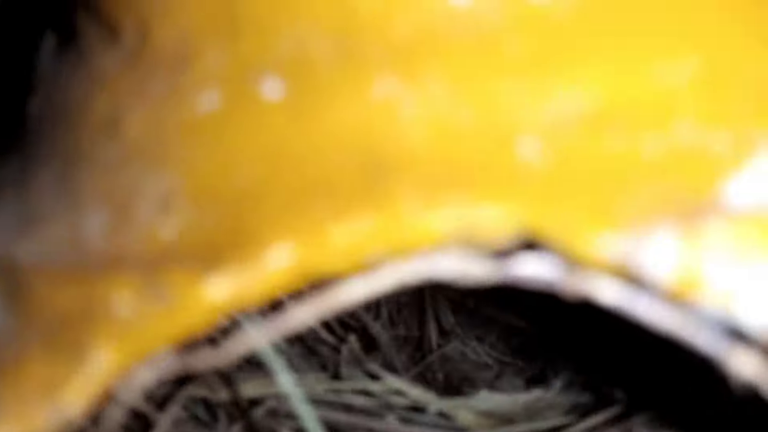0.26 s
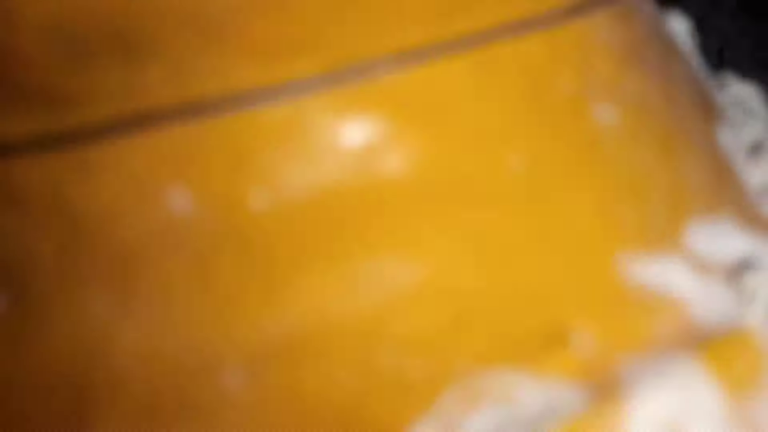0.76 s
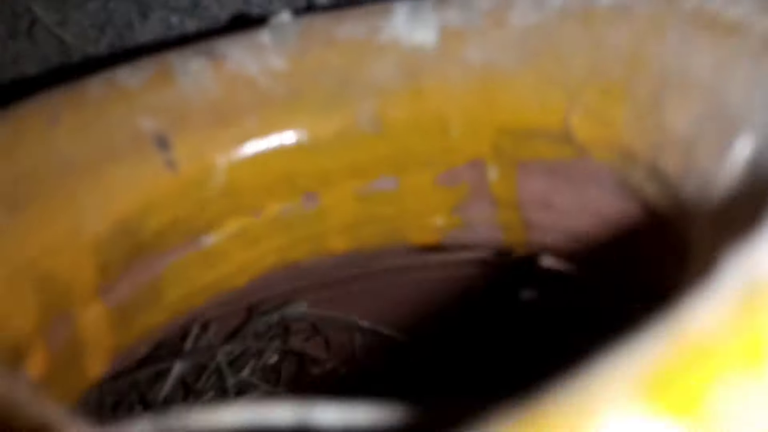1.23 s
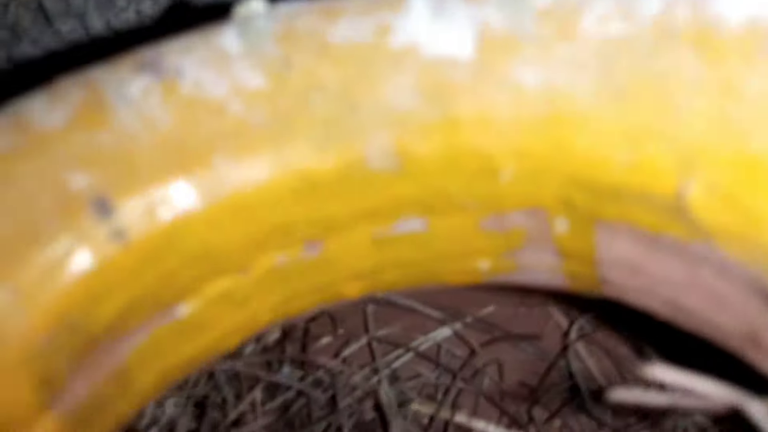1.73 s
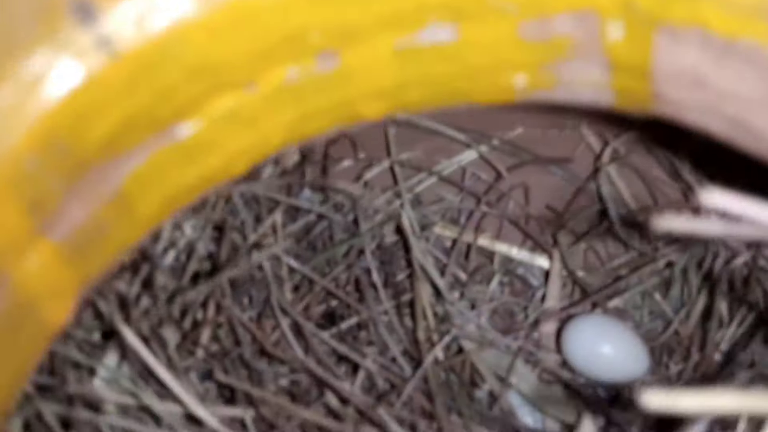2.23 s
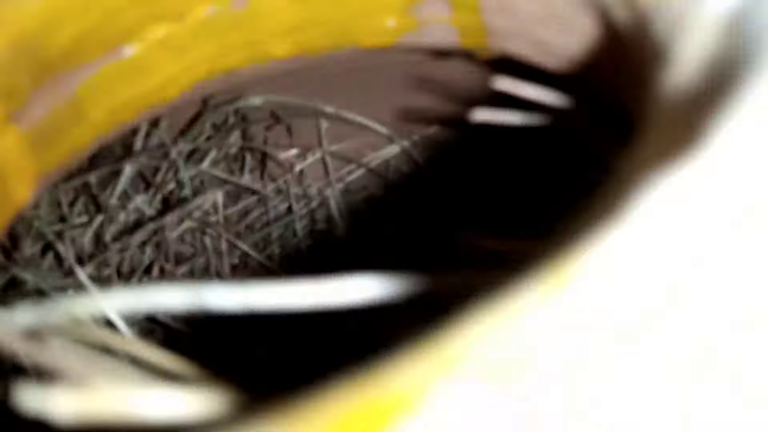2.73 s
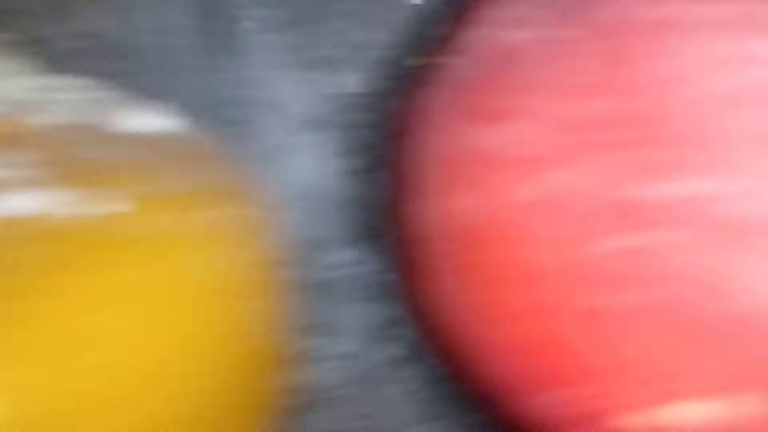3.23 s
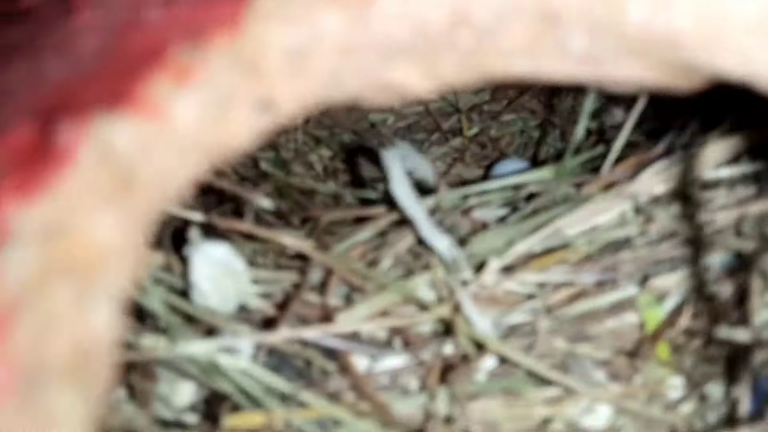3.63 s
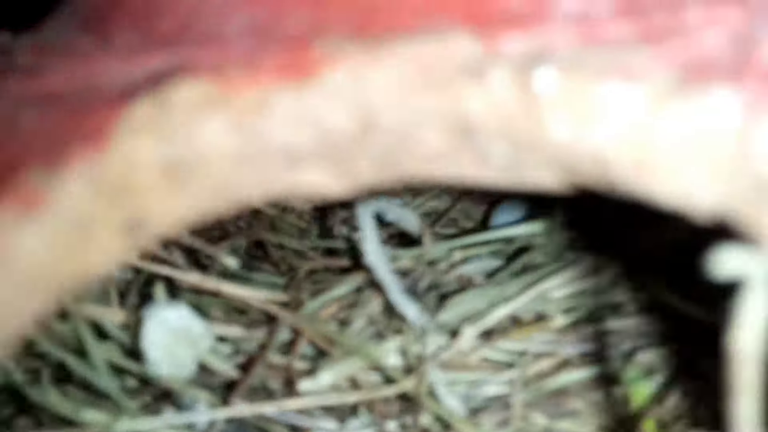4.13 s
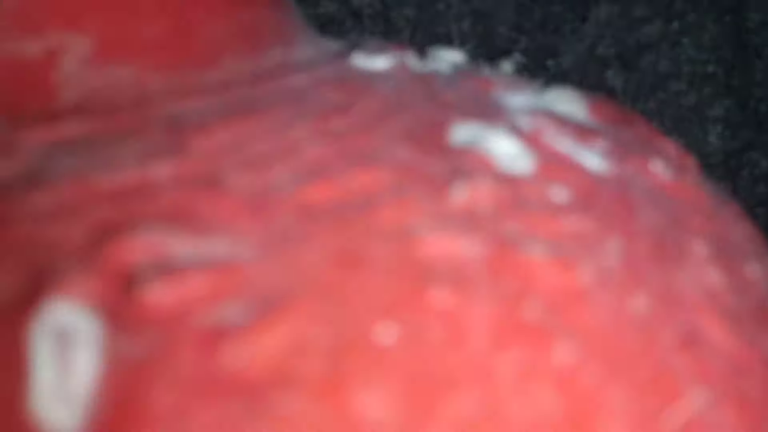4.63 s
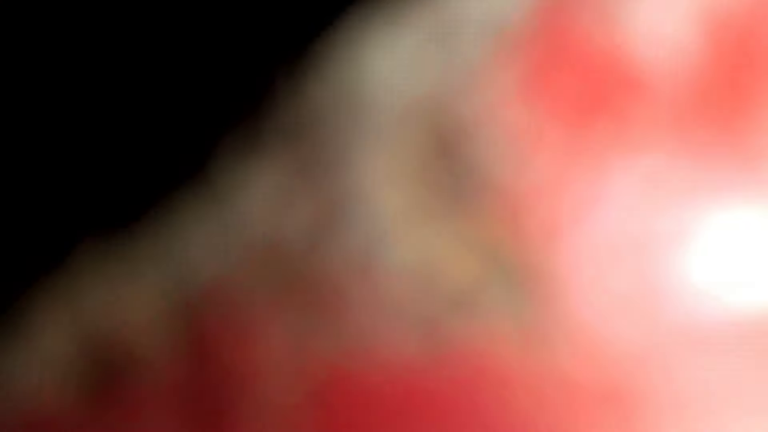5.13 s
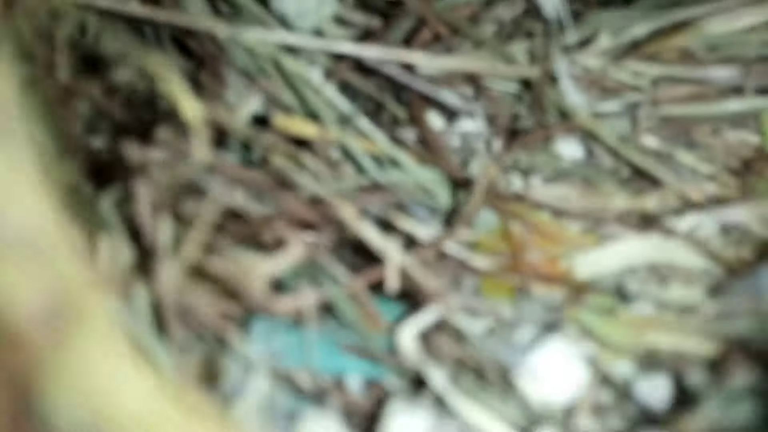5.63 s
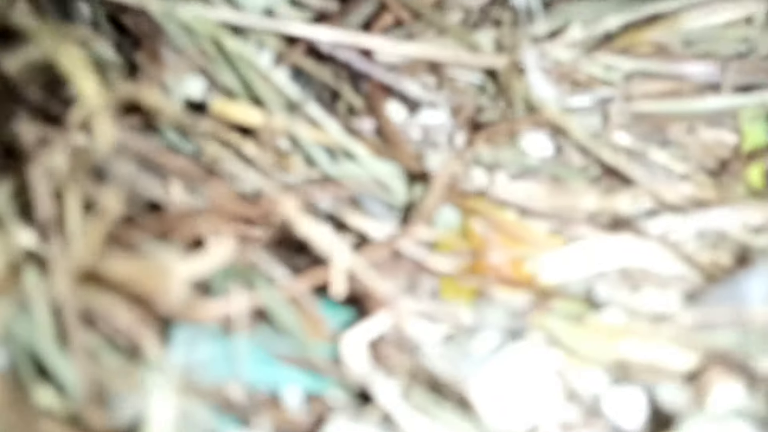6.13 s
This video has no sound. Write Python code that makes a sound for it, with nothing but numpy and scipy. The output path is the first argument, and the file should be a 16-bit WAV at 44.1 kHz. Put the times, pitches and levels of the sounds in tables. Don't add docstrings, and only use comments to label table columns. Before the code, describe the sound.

A hard-walled aviary with short reflections, a soft flock murmur and low outdoor rumble, heard through a small handheld microphone. From 0 to 0.7 s, brief hoarse and clear finch chirps around 2 to 3 kHz mix with wing flaps and soft clay clacks near 0.5 s. A hollow thump lands at 0.8 s, with dry straw scraping. Faint chirps follow at 1 to 1.3 s, then a thin wavering whistle arches up and down at 1.45 to 1.65 s. Until 3 s it is mostly wing flutters, small bright claw ticks and pot taps. At 3.0 to 3.3 s, tiny close peeps join chirps; from 3.6 to 5.3 s calls crowd together, clear, hoarse and squawky, with a pot clack at 3.9 s and a distant dove coo around 4.6 s. After 5.05 s wing rustle and handling rumble surge; a pot clacks at 5.5 s, the hardest knock comes at 6.17 s, and last chirps end it.

```python
import sys
import numpy as np
from scipy import signal
from scipy.fft import rfft, irfft, next_fast_len
from scipy.io import wavfile

SR = 44100
rng = np.random.default_rng(int(sys.argv[2]) if len(sys.argv) > 2 else 0)


def file_out(sig):
    cols = np.atleast_2d(sig).T
    lim = np.clip(cols, -1, 1)
    pcm = np.round(lim * 32767).astype(np.int16)
    wavfile.write(sys.argv[1], SR, pcm)


def voltage_ratio(decibels):
    exponent = np.asarray(decibels, float) / 20
    return 10 ** exponent


N = 280476


def rms_one(x):
    return x / np.sqrt(np.mean(x ** 2) + 1e-20)


def at_hz(points, hz):
    return np.interp(np.log(hz), np.log(np.array(points)[:, 0]), np.array(points)[:, 1])


def in_time(rows):
    s, *columns = np.transpose(rows)
    return [np.interp(np.arange(N) / SR, s, c) for c in columns]


def filtered(x, order, edge_hz, kind):
    return signal.sosfilt(signal.butter(order, edge_hz, kind, fs=SR, output="sos"), x)


def drift(rate_hz, size):
    r = np.exp(-2 * np.pi * rate_hz / SR)
    settle = 8000
    return rms_one(signal.lfilter([1], [1, -2 * r, r * r], rng.standard_normal(size + settle))[settle:])


def bands(size):
    hz = np.maximum(np.arange(size // 2 + 1) * SR / size, 1)
    white = rfft(rng.standard_normal(size))
    for centre in 25 * 2 ** np.arange(0, 10, .5):
        yield centre, hz, white * np.clip(1 - 2 * np.abs(np.log2(hz / centre)), 0, 1)


def hiss(spectrum, patchy_db, rate_hz):
    size, out = next_fast_len(N), 0
    for centre, hz, band in bands(size):
        if spectrum[0][0] <= centre * 1.4 and centre <= spectrum[-1][0] * 1.4:
            flicker = np.repeat(drift(rate_hz * 32, N // 32 + 1), 32)[:N]
            out = out + irfft(band * voltage_ratio(at_hz(spectrum, hz)), size)[:N] * voltage_ratio(patchy_db * flicker)
    return rms_one(out)


def ring(clicks, modes):
    out = 0
    for hz, level_db, t60 in modes:
        r, w = voltage_ratio(-60 / (t60 * SR)), 2 * np.pi * hz / SR
        resonator = [0, voltage_ratio(level_db) * np.sin(w)], [1, -2 * r * np.cos(w), r * r]
        out = out + signal.lfilter(*resonator, clicks + 1e-18)
    return out


def gliding(*groups):
    rows = []
    for table, glide in groups:
        for s, length, hz, level_db, tilt_db in table:
            rows.append((s, length, hz * (1 - glide / 2), hz * (1 + glide / 2), level_db, tilt_db))
    return rows


def chirps(table, jitter, jitter_hz, flutter_db, breath_db, attack):
    # [f/Hz, level/dB]
    beak = [(1500, -5.5), (2300, -2), (4500, 8.5), (6200, 9.5), (7200, 8), (7900, -35), (9000, -21.5),
            (12000, -24.5), (13500, -35), (15000, -24)]
    out, order = np.zeros(N), np.arange(1, 8)[:, None]
    wobble, flutter = drift(jitter_hz, N), voltage_ratio(flutter_db * drift(164, N))
    breath = rms_one(filtered(rng.standard_normal(N), 3, [2600, 7200], "band"))
    for s, length, start_hz, end_hz, level_db, tilt_db in table:
        at = np.arange(round(s * SR), min(round((s + length) * SR), N))
        u = np.linspace(0, 1, len(at))
        arch = 1 + 0.11 * (u * (1 - u) - 1 / 6)
        pitch = (start_hz + (end_hz - start_hz) * u) * arch
        phase = 2 * np.pi * np.cumsum(pitch * (1 + jitter * wobble[at])) / SR
        weight = voltage_ratio(tilt_db * np.minimum(order, 6600 / pitch) + at_hz(beak, order * pitch))
        weight = weight * (order * pitch < .4 * SR)
        note = rms_one(np.sum(weight * np.sin(order * phase), axis=0)) + voltage_ratio(breath_db) * breath[at]
        swell = np.clip(np.minimum(u / attack, (1 - u) / 0.37), 0, 1)
        out[at] += voltage_ratio(level_db) * note * flutter[at] * swell
    return out


def finches():
    clear_falling = [(3.954, .02, 3150, -32, 18), (3.972, 0.029, 2700, -35.5, 18),
                     (1, 0.04, 1780, -49.5, -16), (3.088, .06, 1880, -39, -4),
                     (1.158, 0.026, 2060, -36, -1.5), (2.5, 0.0175, 3620, -44, 40),
                     (5.03, 0.043, 2850, -32, -10)]
    clear_level = [(.545, 0.054, 2630, -33.5, -14), (.556, 0.047, 2546, -29, 15),
                   (3.57, .07, 2125, -51, -25), (4.356, 0.045, 2910, -22, 11), (6.291, .03, 2300, -40, -25),
                   (3.03, 0.035, 1847, -46, -20), (3.108, .025, 2700, -35, 22),
                   (3.497, 0.039, 2540, -53, -25), (3.503, .01, 3210, -44, 25),
                   (4.395, 0.046, 3046, -22.5, 7.5), (5.218, 0.033, 2798, -23, 18),
                   (5.255, .045, 2830, -35, 18), (1.236, 0.023, 2044, -34, 0),
                   (2.625, 0.065, 3230, -43.5, 12), (3.16, 0.02, 3130, -32, 18),
                   (3.19, .05, 3130, -41.5, 18), (3.165, 0.02, 2750, -32.5, 12),
                   (3.605, 0.047, 3515, -45, -18), (4.62, 0.014, 3100, -49, -13),
                   (5.385, 0.017, 2740, -32.5, 15), (6.16, 0.035, 2316, -25, 24),
                   (6.293, 0.067, 2313, -28, 24)]
    clear_rising = [(.772, 0.018, 3600, -47, 19), (3.03, 0.017, 2820, -34.5, 13),
                    (3.042, .018, 3000, -40, 20), (3.657, 0.053, 3220, -26.5, 8),
                    (3.75, 0.046, 3500, -44.5, -15), (4.865, 0.03, 3135, -33, 4),
                    (4.889, .03, 3170, -26, 8)]
    hoarse_falling = [(.096, 0.041, 2150, -39, -9), (.097, .02, 2850, -37, 16),
                      (.112, 0.029, 2990, -28, 14), (.11, 0.044, 2500, -40, 13),
                      (3.325, 0.03, 3060, -43, -23), (1.013, 0.031, 2030, -46, -7),
                      (1.321, 0.03, 1990, -40, 0), (4.915, .055, 2860, -39, -2),
                      (4.42, 0.049, 2800, -38.5, -2), (5.778, 0.034, 2134, -39, -7),
                      (5.808, 0.05, 1940, -34, -5)]
    hoarse_rising = [(4.216, 0.022, 2480, -35, -3), (.688, .04, 2430, -45, 12), (2.73, .05, 1800, -56, -25),
                     (2.68, .04, 2000, -57, -25), (.085, 0.056, 1790, -41.5, -1.5),
                     (1.455, 0.057, 2916, -51, 35), (3.644, 0.082, 3118, -32, 3),
                     (4.35, 0.055, 3045, -26.5, 7), (4.514, 0.0086, 3340, -36, 3),
                     (4.843, 0.1, 3160, -31, -1.5), (5.003, 0.077, 3084, -30.5, 0),
                     (5.784, 0.03, 2400, -36, -2), (5.81, .06, 2520, -45, -18),
                     (6.02, 0.037, 2250, -34.5, 66), (6.085, 0.076, 2145, -42.5, -1),
                     (1.081, 0.029, 2240, -40.5, -4), (6.302, 0.022, 2735, -24, 11),
                     (4.285, 0.025, 2253, -33, -4)]
    harsh_falling = [(.678, 0.025, 3020, -33, -10.5), (3.045, .06, 2400, -44, 8),
                     (3.767, .025, 2600, -35, 8), (3.953, 0.04, 3043, -36.5, 15),
                     (3.045, 0.052, 3650, -44.5, -6), (3.99, .07, 3690, -43, -8),
                     (5.472, .03, 3450, -53, -15), (3.045, 0.048, 2444, -40, -3),
                     (3.96, 0.048, 3310, -42, -12), (4.045, 0.0088, 2270, -48, -3),
                     (4.13, 0.038, 2215, -37, -3), (4.14, 0.049, 3020, -35, 5),
                     (5.205, 0.052, 3235, -39, 35), (5.83, 0.097, 2054, -43.5, -8)]
    # [t/s, length/s, f/Hz, level/dB, tilt/dB per harmonic]
    harsh_rising = [(.562, 0.05, 3010, -35.5, -6), (3.613, .025, 3167, -48, 30),
                    (3.99, 0.05, 2180, -44.5, -5), (4.1, 0.055, 2450, -43, -4),
                    (4.14, 0.042, 3380, -44.5, -19), (.865, 0.076, 3370, -54.5, -6),
                    (3.545, 0.081, 1900, -54.5, -32), (3.02, 0.043, 3440, -47.5, -15),
                    (3.135, 0.054, 1830, -36.5, -4), (3.766, 0.029, 2180, -30.5, 13),
                    (3.833, 0.039, 2810, -34.5, 2), (3.89, 0.031, 2954, -32, 5.5),
                    (3.975, 0.07, 1900, -44, -3), (4.015, 0.03, 2154, -36.5, -2.5),
                    (4.081, 0.03, 2200, -33, -1), (5.025, 0.05, 3044, -28.5, 9),
                    (6.01, 0.026, 2695, -32, 17), (6.158, 0.015, 2797, -26, 7),
                    (6.292, 0.027, 2386, -37, -6)]
    clear = gliding((clear_falling, -0.061), (clear_level, 0), (clear_rising, 0.0674))
    hoarse = gliding((hoarse_falling, -0.0875), (hoarse_rising, 0.0337))
    harsh = gliding((harsh_falling, -0.0615), (harsh_rising, 0.0727))
    song = chirps(clear, jitter=.014, jitter_hz=180, flutter_db=2.5, breath_db=-20, attack=.19)
    song += chirps(hoarse, jitter=0.0318, jitter_hz=212, flutter_db=4, breath_db=-48.0, attack=0.15)
    song += chirps(harsh, jitter=.06, jitter_hz=250, flutter_db=4.5, breath_db=-7, attack=.07)
    return song


def whistle():
    # [t/s, f/Hz, level/dB]
    course = [
        (1.41, 2850, -72),
        (1.45, 2870, -40.5),
        (1.5, 3137, -44.5),
        (1.545, 3540, -46.5),
        (1.575, 3230, -40.5),
        (1.6, 2882, -32.5),
        (1.635, 2862, -32.5),
        (1.665, 2780, -73),
    ]
    # [order, level below the octave/dB]
    upper_partials = [(3, -20), (4, -26), (5, -30)]
    pitch, level_db = in_time(course)
    t = np.arange(N) / SR
    phase = 2 * np.pi * np.cumsum(pitch * (1 + .02 * drift(190, N))) / SR
    upper = sum(voltage_ratio(db) * np.sin(round(order) * phase) for order, db in upper_partials)
    octave_db = -12 + 0.9 * (level_db + 47.0)
    octave = voltage_ratio(octave_db) * (np.sin(2 * phase) + upper)
    sounding = (t > course[0][0]) * (t < course[-1][0])
    return voltage_ratio(level_db + 3.3 * drift(140, N)) * (np.sin(phase) + octave) * sounding


def near_peeps():
    # [t/s, length/s, f/Hz, level/dB, tilt/dB per harmonic]
    rising = [(3.056, .014, 2250, -40, -16), (3.123, .012, 2050, -40, -16), (3.152, .012, 2550, -36, 15),
              (3.261, .011, 2250, -37.5, -20), (3.568, .04, 2650, -51, -25)]
    # [t/s, length/s, f/Hz, level/dB, tilt/dB per harmonic]
    falling = [(3.264, .01, 3500, -41, -20), (3.107, .012, 2150, -40, -16), (3.27, .012, 2330, -35.5, -20)]
    sweep = .42
    notes = gliding((falling, -sweep), (rising, sweep))
    return chirps(notes, jitter=.01, jitter_hz=200, flutter_db=0.5, breath_db=-14, attack=.19)


def wings(rustle_db):
    # [f/Hz, level/dB per Hz]
    plumage = [(530, -1.5), (900, -1.5), (1230, -2), (1340, -1.5), (1630, 1), (2320, 2), (2850, -1),
               (3290, 5.5), (4040, 3), (6180, 5), (8270, -7), (13400, -17.5), (15200, -1.5), (16300, -20)]
    # [t/s, peak level of hiss/dB, wing body above it/dB]
    snaps = [(.3466, -39, -1), (.464, -27.5, -5), (.9744, -38.5, 19), (1.0849, -42, -4),
             (1.5229, -36.5, 6.5), (1.7225, -44.5, 12), (1.85, -41, 4), (1.137, -44, 6), (1.76, -42, 10),
             (3.7685, -44, 15), (3.913, -35, 29), (4.318, -28.5, -3.5), (4.361, -40, 12), (4.4643, -38, 0),
             (4.5146, -37, 6.5), (4.6224, -46, -2), (3.505, -46, 7), (.415, -43, -1), (2.29, -43, 8.5),
             (5.1841, -30.5, 24), (5.3704, -35, 12), (5.66, -38.5, 22), (6.0164, -54, -2), (6.151, -35, 33)]
    # [t/s, peak level of hiss/dB, wing body above it/dB]
    flaps = [(.16, -40.5, 14), (.237, -45.5, 0), (1.1368, -41, 3), (1.3977, -43, 5.5), (1.9614, -42, 8.5),
             (1.9979, -45, 9.5), (2.0443, -45, 9.5), (2.5127, -45, 9.5), (2.819, -42, 5), (2.9165, -35, 3),
             (3.1053, -61, -4), (3.3967, -38, 10), (3.411, -47, 17), (3.6541, -40, 20), (4.2482, -43, 3),
             (4.2617, -35, -10), (4.73, -42.5, 3.5), (5.016, -57, 24), (5.0544, -45, 12), (5.1307, -33, 12),
             (5.3158, -37, -25), (5.7309, -41, -2), (6.0681, -43, 12), (6.2946, -53, 25)]
    # [t/s, peak level of hiss/dB, wing body above it/dB]
    sweeps = [(.0927, -46, 22), (.529, -43, 2), (.6843, -49, 12), (.95, -44, 6.5), (1.2211, -42.5, 4.5),
              (1.56, -39.5, 9.5), (1.9072, -44, 6.5), (2.2039, -40, 3), (2.5523, -45, 11),
              (2.586, -41.5, 12), (2.8447, -42.5, 8), (3.1246, -31, 4), (3.2261, -37.5, 5),
              (3.3334, -38.5, 7.5), (3.623, -32, -12), (3.8891, -48, 5), (3.953, -43, 31),
              (5.0894, -37, 12), (5.5672, -38.5, 9), (5.912, -36.5, -7)]
    feathers, after = hiss(plumage, patchy_db=2.0, rate_hz=23), np.arange(SR // 4) / SR
    body = filtered(feathers, 4, 8500, "low")
    tips = filtered(feathers, 4, 8500, "high")
    tip_power = voltage_ratio(2 * rustle_db)
    body_power = voltage_ratio(2 * (rustle_db + 13.0))
    for table, t60_s in (snaps, 0.084), (flaps, 0.19), (sweeps, 0.32):
        for s, peak_db, body_db in table:
            i = round((s - 0.0043) * SR)
            rise = np.minimum(after / 0.0082, 1) ** 2
            fade = (voltage_ratio(-120 * after / t60_s) * rise)[:N - i]   # power, so twice 60 dB
            tip_power[i:i + len(fade)] += voltage_ratio(2 * (peak_db - 8.0)) * fade
            body_power[i:i + len(fade)] += voltage_ratio(2 * (peak_db + min(body_db, 12) - 6.5)) * fade
    crackle = voltage_ratio(2.34 * drift(155, N))
    return crackle * (rms_one(tips) * np.sqrt(tip_power) + rms_one(body) * np.sqrt(body_power))


def pots():
    # [t/s, peak level/dB, hollow share/dB, wall ring share/dB]
    knocks = [(.392, -36.5, 5.5, -42), (0.509, -36.5, 6, -31), (0.537, -43, 14, -30), (.549, -32.5, 6, -7),
              (0.565, -37, 14.5, -30), (.592, -33.5, 7, -16), (1.523, -28, -27, -46),
              (1.985, -24.5, -33, -14), (2.085, -32.5, -44, -41), (3.343, -25, 0.5, 8),
              (3.904, -18.5, -16, -3.5), (4.047, -40.5, 11, -35), (4.741, -49, -21, 14),
              (5.532, -20.5, -54, -9), (6.004, -42.5, 17, -15), (6.069, -31, -15, -16),
              (6.174, -11.5, -9, -29), (6.182, -21, -26, -23)]
    # [f/Hz, level/dB, t60/s]
    hollow = [(285, 6, 0.056), (398, -3.5, 0.059)]
    # [f/Hz, level/dB, t60/s]
    rim = [(494, 7.5, 0.029), (876, -2.5, 0.016), (1240, 0.5, 0.017), (2190, -14, 0.025)]
    # [f/Hz, level/dB, t60/s]
    wall = [(1426, -5.5, 0.24), (1680, -9, 0.06), (730, -24, 0.11)]
    # [f/Hz, level/dB, t60/s]
    next_wall = [(1450, -4, 0.099), (1620, -6, 0.065), (730, -25, .11)]
    s, peak_db, hollow_db, wall_db = np.transpose(knocks)
    later = s > 3.6
    parts = ((rim, -4), (hollow, hollow_db), (wall, wall_db - 99 * later), (next_wall, wall_db - 99 * ~later))
    out = 0
    for modes, share_db in parts:
        clicks = np.zeros(N)
        clicks[np.round(s * SR).astype(int)] = voltage_ratio(peak_db + share_db - 8.5)
        out = out + ring(clicks, modes)
    return filtered(out, 3, [130, 2200], "band")


def thump():
    # [f/Hz, level/dB, t60/s]
    floor = [(101, -9.5, 0.15), (187, 4, 0.037), (291, 1.5, 0.043), (473, 2.5, 0.046), (663, 9, 0.013),
             (986, -2, 0.022), (1234, 11.5, 0.0083), (1900, 9, 0.0034)]
    # [delay/s, level/dB]
    rebounds = [
        (.012, -18),
        (.021, -18),
        (.034, -24),
    ]
    blow_s, blow_db = .7838, -18
    click = np.zeros(N)
    click[round(blow_s * SR)] = -voltage_ratio(blow_db)
    for k, (delay, db) in enumerate(rebounds):
        click[round((blow_s + delay) * SR)] = (-1) ** k * voltage_ratio(blow_db + db)
    return filtered(ring(click, floor), 2, [70, 3500], "band")


def ticks():
    # [t/s, peak level/dB]
    contacts = [(0.977, -28), (1.1358, -29), (1.5224, -33), (1.6796, -38), (1.8282, -30.5), (1.9076, -27),
                (2.045, -30), (2.5127, -30), (2.8195, -31), (2.8439, -25), (3.4474, -27), (3.6517, -19.5),
                (4.5151, -23.5), (5.1841, -18.5)]
    # [f/Hz, level/dB per Hz]
    wire = [(3000, -11), (4500, -1.5), (6200, 1.5), (8000, -9.5), (13000, -20.5), (15200, -7)]
    rise_s, t60_s = .0015, .05
    out, after = np.zeros(N), np.arange(SR // 10) / SR
    hz = np.maximum(np.arange(len(after) // 2 + 1) * SR / len(after), 1)
    colour = voltage_ratio(at_hz(wire, hz)) * np.minimum(hz / wire[0][0], 1) ** 2
    fade = np.minimum(after / rise_s, 1) * voltage_ratio(-60 * after / t60_s)
    for s, peak_db in contacts:
        i = round((s - rise_s) * SR)
        burst = rms_one(irfft(rfft(rng.standard_normal(len(after))) * colour, len(after)))
        out[i:i + len(after)] += voltage_ratio(peak_db - 6.5) * burst * fade
    return out


def straw():
    # [t/s, length/s, level/dB]
    scrapes = [
        (0.462, 0.077, -50),
        (1.52, 0.12, -58),
        (2.375, .05, -54),
        (.80, .08, -42),
    ]
    grains = rng.standard_normal(N) * voltage_ratio(5.0 * drift(120, N))
    grains = rms_one(filtered(grains, 2, [895, 1900], "band"))
    t, level = np.arange(N) / SR, 0
    for s, length, db in scrapes:
        level = level + voltage_ratio(db) * np.clip(np.minimum((t - s) / 0.0065, 1.5 * (1 - (t - s) / length)), 0, 1)
    return grains * level


def aviary(x):
    # [f/Hz, t60/s]
    decay = [(100, .45), (500, .33), (2000, .25), (4000, .24), (6000, .26), (14000, .11)]
    size = SR // 2
    after, tail = np.arange(size) / SR, 0
    for centre, _, band in bands(size):
        tail = tail + irfft(band, size) * voltage_ratio(-60 * after / at_hz(decay, centre))
    tail = tail * np.clip((after - .002) / 0.0017, 0, 1)
    return signal.fftconvolve(x, tail / np.sqrt(np.sum(tail ** 2)))[:N]


def dove():
    # [t/s, f/Hz, level/dB]
    coo = [
        (4.40, 723, -64),
        (4.46, 749, -59),
        (4.6, 723, -54.5),
        (4.75, 730, -60),
        (4.82, 730, -61),
        (4.87, 717, -83),
    ]
    pitch, level_db = in_time(coo)
    phase = 2 * np.pi * np.cumsum(pitch * (1 + .07 * drift(30, N))) / SR
    return voltage_ratio(level_db + 0.4 * drift(24, N)) * (np.sin(phase) + voltage_ratio(-10.0) * np.sin(2 * phase))


def murmur(air_db, rustle_db):
    # [f/Hz, level/dB per Hz]
    stir = [(230, -11), (386, -2.5), (725, -0.5), (1100, -5.5), (3060, -8.5), (5490, -15), (9000, -27.5),
            (11700, -111)]
    level_db = -50.5 + 0.81 * (air_db - air_db.mean()) + 0.32 * (rustle_db - rustle_db.mean())
    return voltage_ratio(level_db) * hiss(stir, patchy_db=5.0, rate_hz=10.5)


def rumble(air_db):
    # [f/Hz, level/dB per Hz]
    outdoors = [(20, -19), (38, -16.5), (87, 2), (165, -6.5), (205, 1), (245, -10.5), (400, -9), (520, -15),
                (880, -120)]
    return voltage_ratio(air_db) * hiss(outdoors, patchy_db=3.5, rate_hz=2.5)


def deep_bass():
    # [t/s, level/dB]
    bass_swells = [(0, -52), (.3, -56), (.5, -72), (1.6, -78), (1.72, -50), (1.95, -50), (2.3, -65), (2.55, -49),
                   (2.75, -71), (3.55, -70), (3.7, -49), (4.0, -61), (4.6, -53), (5.0, -56), (5.07, -37.5),
                   (5.45, -40), (5.65, -64), (6.36, -39)]
    # [f/Hz, level/dB per Hz]
    bass_colour = [(30, -9), (50, -3.5), (75, -4), (135, 1), (220, -26)]
    return voltage_ratio(in_time(bass_swells)[0]) * hiss(bass_colour, patchy_db=0.5, rate_hz=8.9)


def scene():
    # [t/s, level/dB]
    moving_air = [(0, -46), (.35, -51.5), (.75, -59.5), (.95, -51.5), (1.25, -48), (1.5, -56.5), (1.7, -49),
                  (2.6, -46.5), (2.8, -51), (3.1, -53), (3.75, -45.5), (4.2, -51), (4.5, -55.5),
                  (4.8, -46.5), (5.03, -47.5), (5.08, -35.5), (5.8, -39), (6.36, -42)]
    # [t/s, level/dB]
    rustle = [(0, -73.5), (.75, -71.5), (.8, -74.5), (1.0, -78), (2.0, -72.5), (2.4, -78.5), (2.8, -74),
              (3.3, -65.5), (3.56, -74.5), (3.9, -73.5), (4.9, -77.5), (5.0, -72), (5.05, -50.5),
              (5.3, -60), (5.65, -59.5), (5.72, -76), (6.36, -51)]
    (air_db,), (rustle_db,) = in_time(moving_air), in_time(rustle)
    song = finches() + whistle()
    peeps, flaps, knocks, blow = near_peeps(), wings(rustle_db), pots(), thump()
    direct = voltage_ratio(-1) * song + peeps + flaps + knocks + blow
    to_walls = voltage_ratio(-4.5) * song + voltage_ratio(-9) * flaps + voltage_ratio(-10.5) * knocks
    to_walls = to_walls + voltage_ratio(-14) * blow + voltage_ratio(-14) * peeps + dove()
    walls = aviary(to_walls)
    direct = direct + ticks() + straw()
    loud_db = 10 * np.log10(signal.lfilter([.0008], [1, -.9992], (direct + walls) ** 2) + 1e-12)
    air = murmur(air_db, rustle_db) * voltage_ratio(-.7 * np.maximum(loud_db + 36.0, 0))
    air = air + rumble(air_db) * voltage_ratio(-.6 * np.maximum(loud_db + 31.5, 0))
    return (direct + walls + air + deep_bass())[None]


def low_pass(x):
    return signal.sosfilt(signal.butter(12, 16970, fs=SR, output="sos"), x)


def record(dry):
    x = filtered(dry, 6, 44, "high")
    x = .5 * np.tanh(x / .5)
    x = signal.sosfilt(signal.cheby2(12, 60, 16450, fs=SR, output="sos"), x)
    return low_pass(x)


dry = scene()
out = record(dry)
file_out(out)
```